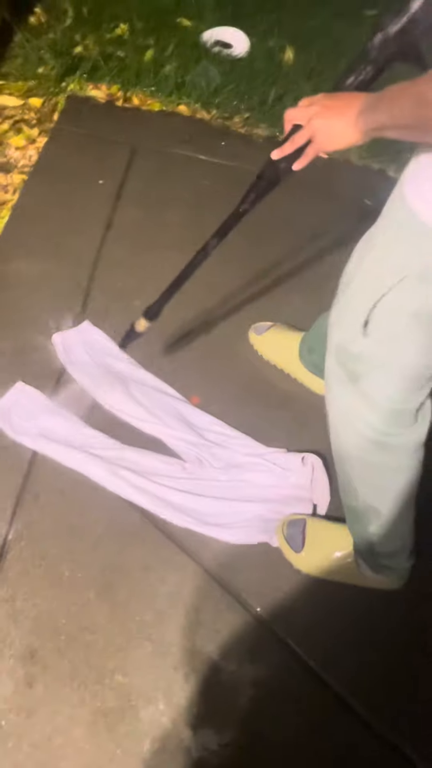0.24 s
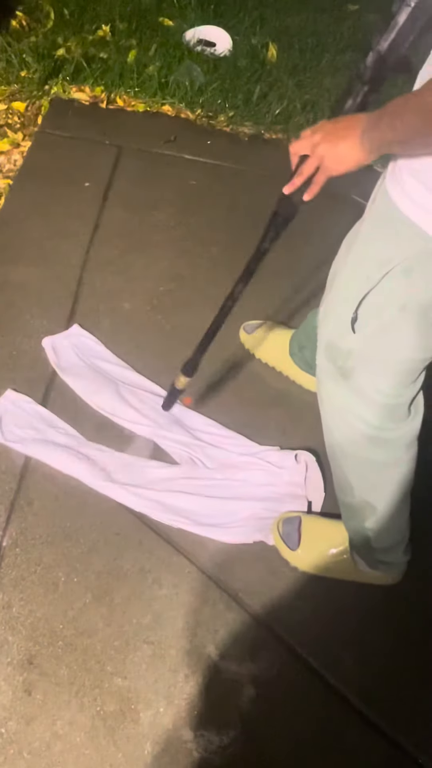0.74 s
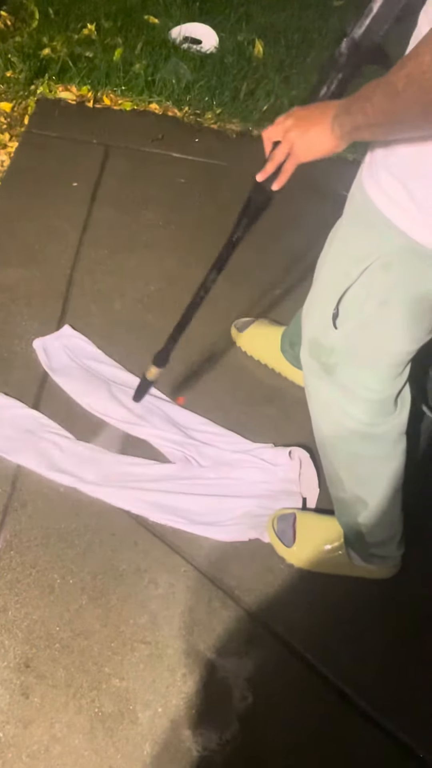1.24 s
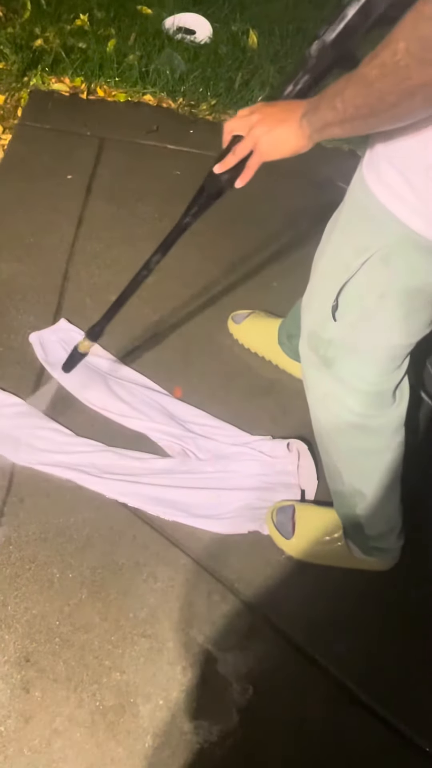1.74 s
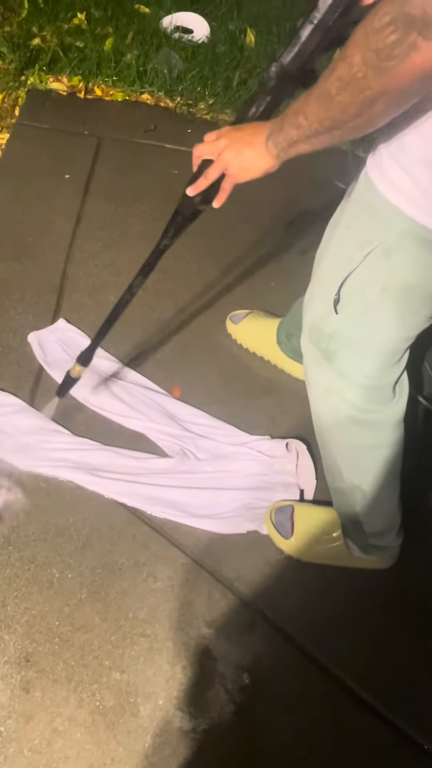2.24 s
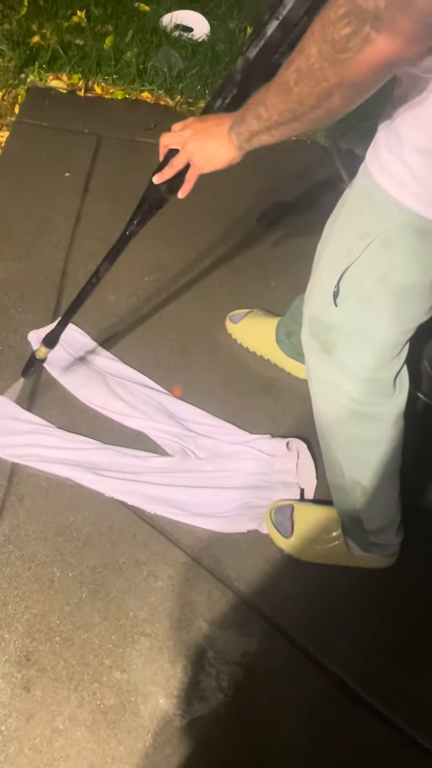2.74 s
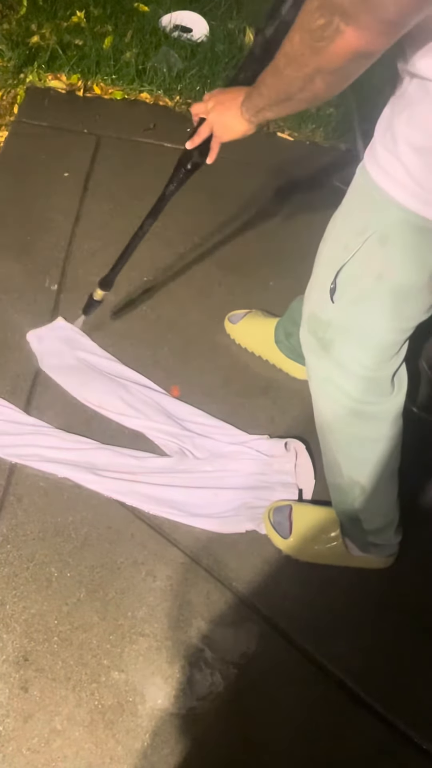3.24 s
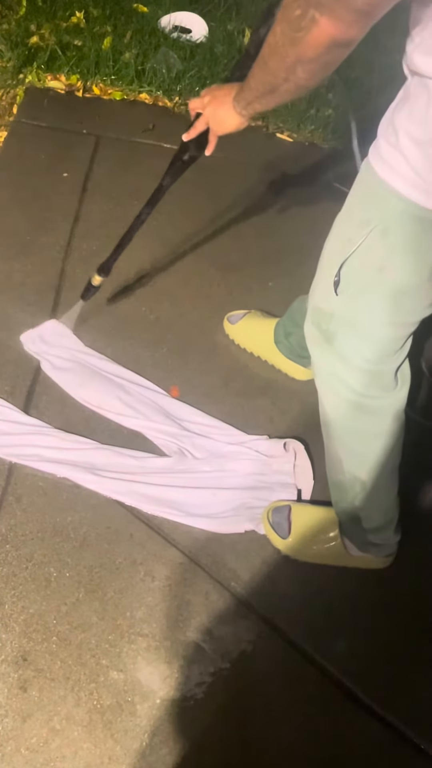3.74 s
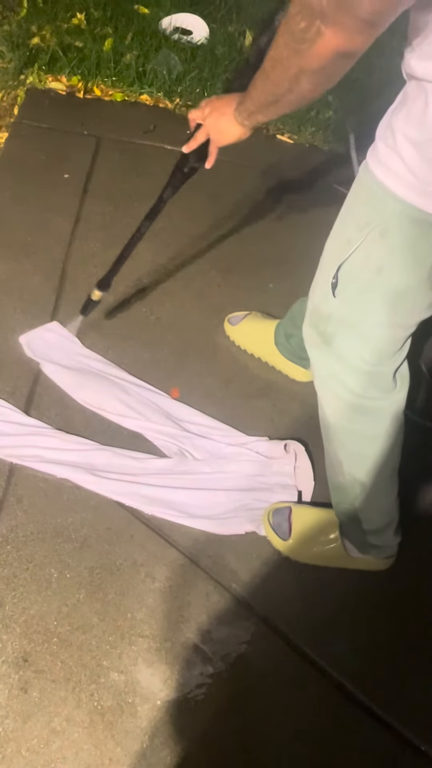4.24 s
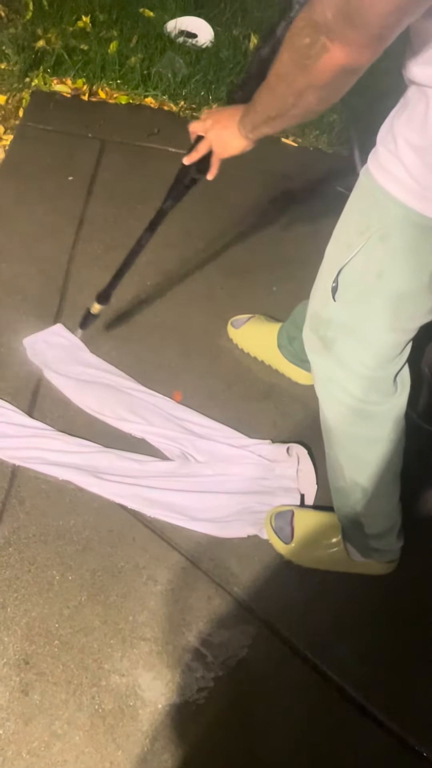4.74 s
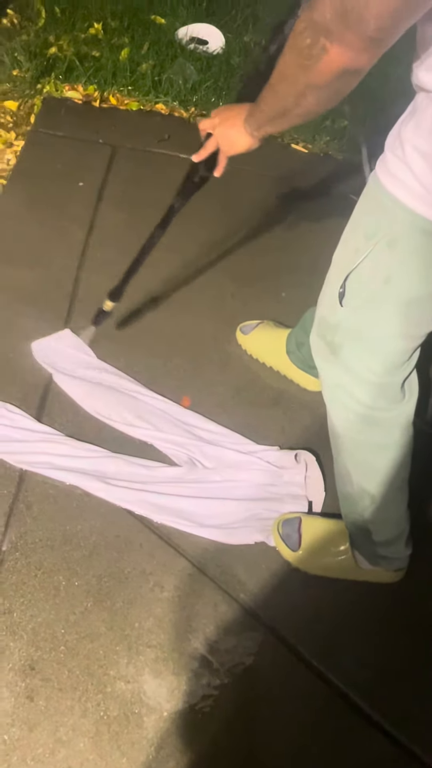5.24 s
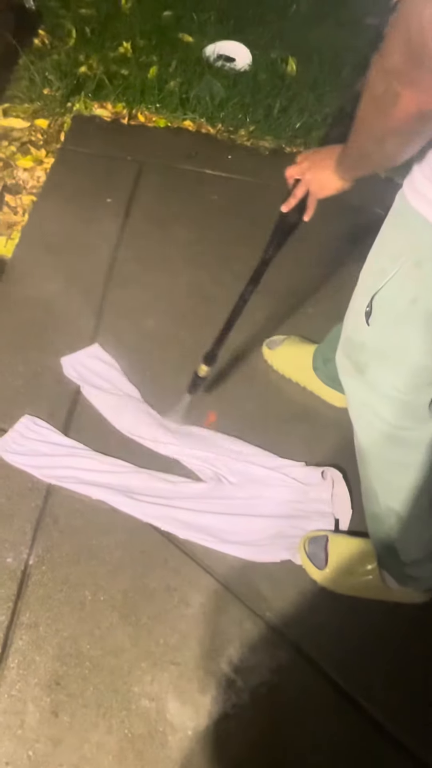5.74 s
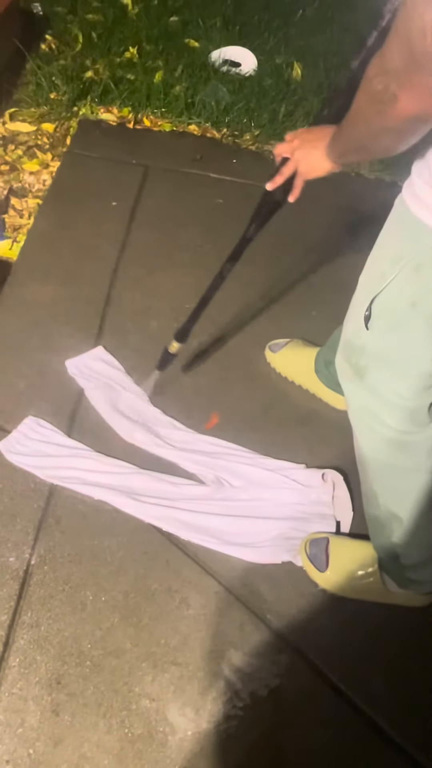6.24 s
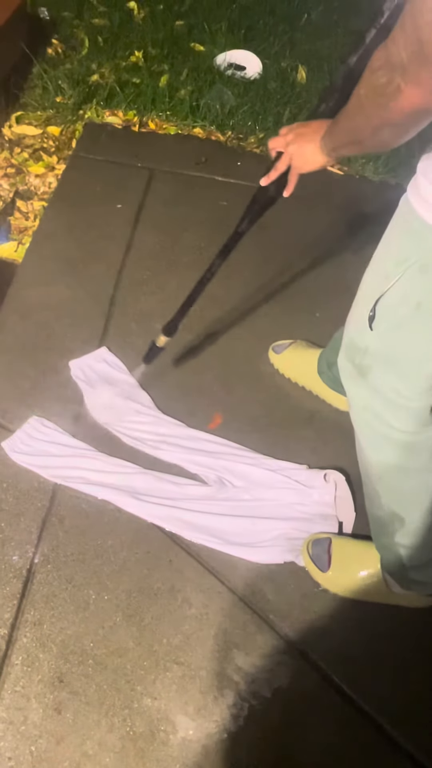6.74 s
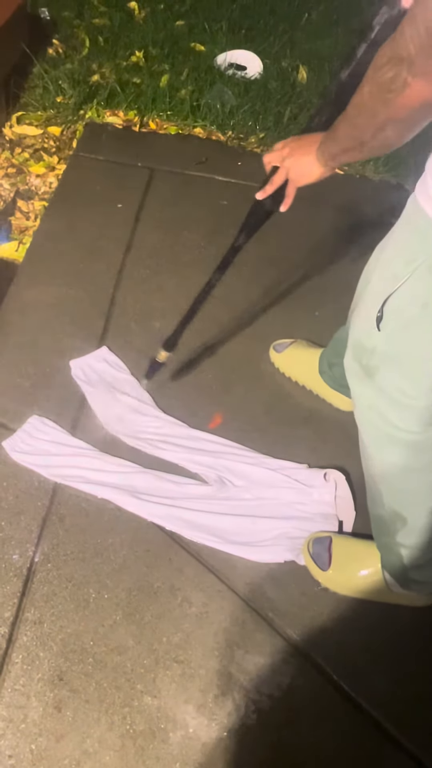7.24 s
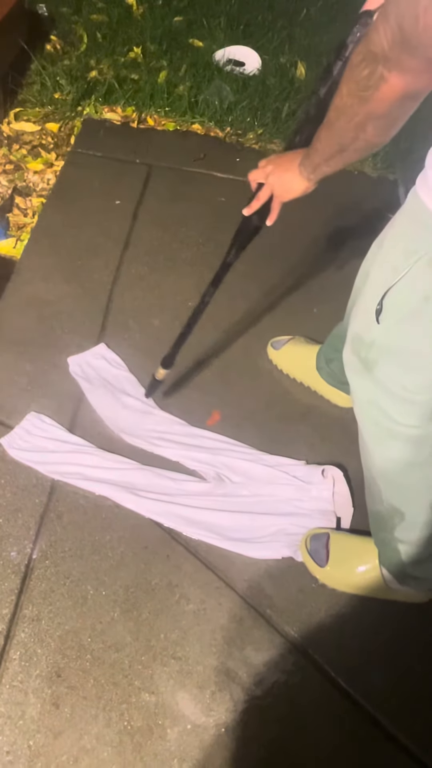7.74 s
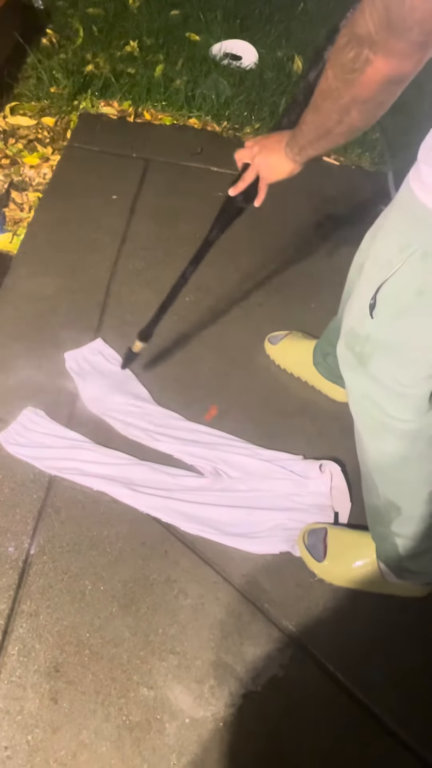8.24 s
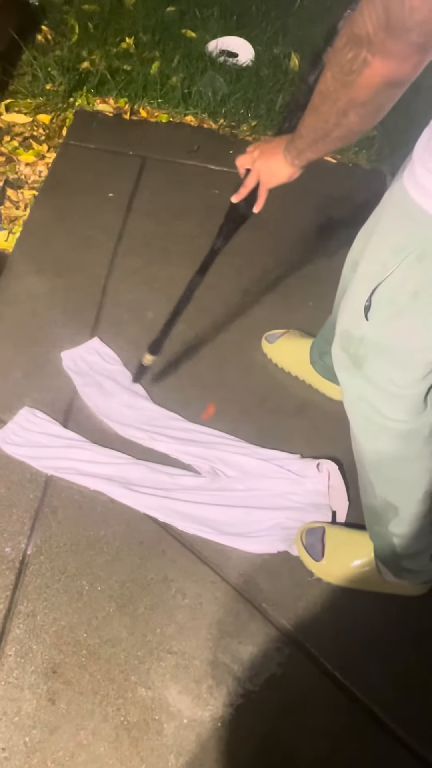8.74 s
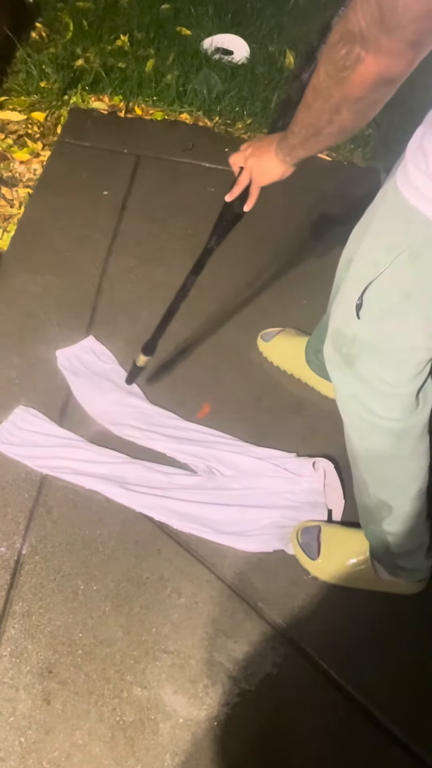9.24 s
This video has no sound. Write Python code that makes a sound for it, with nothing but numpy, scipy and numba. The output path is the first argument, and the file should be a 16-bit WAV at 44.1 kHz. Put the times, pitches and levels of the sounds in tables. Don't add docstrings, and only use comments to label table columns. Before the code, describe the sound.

Outdoors on a paved yard, an electric pressure washer runs continuously, its fast pump knock and motor hum forming a steady buzzing drone with rushing cooling air. Close in front, a dense, bright spray hisses and splashes over soaked trousers, surging with each wand stroke, drumming hollowly on wet fabric and thudding softly on the slab. The spray is strongest early and thinner later, while a faint gear whine comes and goes. Close phone stereo.

```python
import sys
import numpy as np
from scipy import signal
from scipy.fft import rfft, irfft, next_fast_len
from scipy.io import wavfile
from scipy.ndimage import uniform_filter1d
from numba import njit

SR = 44100
rng = np.random.default_rng(int(sys.argv[2]) if len(sys.argv) > 2 else 0)


def magnitude_from_level(level_db):
    exponent = np.asarray(level_db, float) / 20
    return 10 ** exponent


def store_wav(level_fs):
    pcm = np.round(np.clip(np.atleast_2d(level_fs), -1, 1) * 32767)
    wavfile.write(sys.argv[1], SR, pcm.T.astype(np.int16))


N = 418950

PUMP_HZ, SWIRL_HZ = 71.98, 98.9
SPLASH_REF_DB = -30.5
# start_s, splash_db, swirl_depth (0-1)
AIM = [(0, -26.5, 0), (.2, -31, 0.2), (.8, -29.5, .15), (1.15, -31.5, 0.1), (1.5, -28, 0.2),
       (1.8, -28.5, .6), (2.23, -30.5, 0.2), (2.8, -29, .5), (3.02, -34.5, 0), (3.5, -33.5, .2),
       (4.1, -32, .15), (4.48, -37.5, 0.5), (4.9, -33, .2), (5.65, -38, .08), (6.0, -32.5, 0),
       (7.0, -31.5, 0.3), (7.62, -36.5, .15), (9.5, -34.5, .12)]


def set_rms(x, db):
    return x * magnitude_from_level(db) / np.sqrt(np.mean(x ** 2))


def read_curve(table, hz):
    row_hz, value = np.transpose(table)
    return np.interp(np.log(hz + 1), np.log(row_hz + 1), value)


def automate(table):
    at_s, *values = np.transpose(table)
    return [np.interp(np.arange(N) / SR, at_s, value) for value in values]


def swells(at_s, size, width_s):
    coarse_s = np.arange(0, N / SR + .01, .005)
    bells = np.exp(-((coarse_s[:, None] - at_s) / width_s) ** 2 / 2) @ size
    return np.interp(np.arange(N) / SR, coarse_s, bells)


def equalise(x, gain):
    size = next_fast_len(N)
    hz = np.arange(size // 2 + 1) * SR / size
    return irfft(rfft(x, size) * gain(hz), size)[..., :N]


def tinted(x, table):
    return set_rms(equalise(x, lambda hz: magnitude_from_level(read_curve(table, hz))), 0)


def walk(rate):
    hold = int(SR / rate)
    held = np.repeat(rng.standard_normal(N // hold + 1), hold)
    return 1.3 * uniform_filter1d(uniform_filter1d(held, hold), hold)[:N]


def turns(hz, drift):
    return 2 * np.pi * np.cumsum(hz * (1 + drift * walk(3))) / SR


def noise():
    return rng.standard_normal((3, N))


@njit
def band(x, hz, damp):
    y = np.empty_like(x)
    for c in range(x.shape[0]):
        b, l = 0., 0.
        for i in range(x.shape[1]):
            g = np.tan(np.pi * hz[i] / SR)
            v = (b + g * (x[c, i] - l)) / (1 + g * (g + damp))
            b, l, y[c, i] = 2 * v - b, l + 2 * g * v, damp * v
    return y


def tone(angle, mid_db, side_db, scatter=1):
    angle = angle + 2 * np.pi * scatter * rng.random()
    side = magnitude_from_level(side_db) * np.sin(angle - 1.18)
    waver = magnitude_from_level(1.5 * walk(6))
    return np.sqrt(2) * waver * (magnitude_from_level(mid_db) * np.sin(angle) + np.array([side, -side]))


def fan(pump):
    # pitch_hz, level_db
    rush = [(30, -45.5), (60, -15), (130, -14.5), (250, -8), (330, 1.5), (520, 1.5), (720, -3.5),
            (900, 3.5), (1250, -2), (1700, -2), (2400, -4.5), (3300, -8.5), (4300, -5), (5500, -16.5)]
    air = tinted(noise() * (1 + .25 * np.cos(pump)), rush)
    return set_rms(air * magnitude_from_level(0.41 * walk(7.1)), -36.5)


def washer(pump):
    # mid_db, side_db
    knock = [(-57, -95), (-61, -86), (-47.5, -83.5), (-49, -68.5), (-36.5, -51), (-68, -66), (-36.5, -44),
             (-63.5, -55.5), (-48, -51.5), (-73.5, -49), (-42.5, -75.5), (-44.5, -67), (-59, -57.5),
             (-39, -46), (-49, -76), (-48, -53), (-48.5, -59), (-82, -49), (-55.5, -65), (-57, -66),
             (-54.5, -57.5), (-55, -61), (-46, -50.5), (-48.5, -54), (-74.5, -63), (-66, -61), (-73, -70),
             (-63.5, -59.5), (-53, -53), (-60, -60.5)]
    # multiple of shaft rate, mid_db, side_db
    shaft = [(1, -43.5, -54.5), (2, -53, -58), (3, -58.5, -60), (13, -64, -64.5), (15, -46.5, -59)]
    # pitch_hz, level_db
    beats = [(180, -57), (250, -60.5), (400, -55), (470, -47), (550, -58), (700, -54.5), (800, -56.5),
             (1000, -52), (1200, -58), (1600, -77.5)]
    # start_s, mid_db
    whine = [
        (0, -58.5),
        (5.8, -57),
        (6.3, -47.5),
        (6.8, -54),
        (7.3, -49),
        (7.94, -41),
        (8.44, -52),
        (8.8, -45.5),
        (9.5, -53.5),
    ]
    gear = 50 / 11
    out = 0
    for k, (mid_db, side_db) in enumerate(knock):
        out = out + tone((k + 1) * pump, mid_db, side_db, scatter=1 if k < 9 else .45)
    for k, mid_db, side_db in shaft:
        out = out + tone(int(k) * gear * pump, mid_db, side_db)
    out = out + tone(50 * pump, automate(whine)[0] - 4, -48)
    out = out + tone(49 * pump, -60.5, -53)
    sums = [(k + gear, 0) for k in range(-2, 18) if k]
    differences = [(k - gear, -2) for k in range(12, 29)]
    for k, trim_db in sums + differences:
        mid_db = trim_db + read_curve(beats, k * PUMP_HZ)
        side_db = mid_db - 8 - 18 * (k < 4)
        out = out + tone(k * pump, mid_db, side_db)
    return out


def cloth(swirl):
    # start_s, pitch_hz, drum_db
    pockets = [(0.0, 432, -47), (.27, 810, -33), (.58, 780, -32.5), (.88, 566, -37), (1.0, 1000, -38),
               (1.152, 677, -38), (1.36, 600, -31.5), (1.53, 976, -33), (1.75, 995, -30.5),
               (2.0, 965, -30.5), (2.14, 590, -35), (2.27, 852, -38), (2.65, 1004, -31.5),
               (2.87, 438, -42.5), (3.15, 600, -43), (3.5, 880, -36.5), (3.75, 1113, -35),
               (4.118, 680, -35), (4.52, 557, -37), (4.87, 1087, -35.5), (5.152, 710, -37),
               (5.93, 400, -31.5), (6.15, 480, -39), (6.37, 660, -33), (6.75, 760, -38), (7.0, 756, -41.5),
               (7.4, 690, -38), (7.87, 724, -35), (8.55, 597, -43), (9.37, 904, -37.5)]
    # start_s, thud_db
    thuds = [(.12, -44), (.45, -40), (.85, -48.5), (1.02, -40), (1.369, -43), (1.52, -57), (2.52, -46.5),
             (2.95, -53), (3.15, -56), (3.45, -49.5), (5.1, -53.5), (6.24, -45.5), (6.68, -49),
             (8.48, -52.5)]
    handover_s, pocket_s, thud_s, damp = .05, .065, .07, .46
    force_db = automate(AIM)[0] - SPLASH_REF_DB

    at_s, pocket_hz, peak_db = np.transpose(pockets)
    weighted = swells(at_s, magnitude_from_level(peak_db) * np.log(pocket_hz), handover_s)
    hz = np.exp(weighted / swells(at_s, magnitude_from_level(peak_db), handover_s))
    drum_gain = magnitude_from_level(-45 + 1.3 * force_db) + swells(at_s, magnitude_from_level(peak_db), pocket_s)
    at_s, peak_db = np.transpose(thuds)
    thud_gain = magnitude_from_level(-53 + .4 * force_db + 2.7 * walk(7)) + swells(at_s, magnitude_from_level(peak_db), thud_s)

    passes = np.diff(np.floor(swirl / (2 * np.pi)), prepend=0)
    uneven = walk(60)
    blows = passes * magnitude_from_level(3.0 * uneven)
    blows = set_rms(blows - blows.mean(), 0)
    steady = passes * magnitude_from_level(1.3 * uneven)
    steady = set_rms(steady - steady.mean(), 0)

    gurgle = noise() * magnitude_from_level(2.5 * walk(200))
    drive = blows * np.array([[1], [0], [0]]) + gurgle
    drum = band(band(drive, hz, damp), hz, 1.8 * damp)
    drum = drum / np.sqrt(uniform_filter1d(drum[0] ** 2, SR // 6))
    low_hz = np.full(N, 135.)
    thud = band(band(steady + 0.22 * noise()[:1], low_hz, 2.0), low_hz, 2.0)
    return drum * drum_gain + set_rms(thud, 0) * thud_gain


def jet(swirl):
    # pitch_hz, level_db
    splash = [(700, -19), (1200, -2), (1700, 0), (2200, -1), (2800, 2.5), (3400, -3), (4300, -3),
              (4800, -18), (6500, -13.5)]
    hiss = [(3500, -22), (4300, -7.5), (4750, -6.5), (4900, 0), (5700, -1.5), (7500, -3), (8800, -6),
            (10500, -15)]
    mist = [(7500, -17), (9000, -2.5), (10500, .5), (12000, -2), (13300, -3.5), (14500, -1.5), (15600, 1)]
    bright_band = [(2300, -22), (2900, -3), (3250, 0.5), (3700, -4), (4200, -21.5)]
    # start_s, level_db
    mist_rise = [
        (0, -30),
        (.55, -37),
        (.75, -34),
        (1.4, -36),
        (3.1, -31),
        (4.5, -32.5),
        (6.4, -33.5),
        (9.5, -29),
    ]
    # start_s, lift_db
    strokes = [(0.0, 1), (0.469, 1.5), (.85, 1.5), (1.02, 2), (1.361, 2.5), (1.66, 1), (2.001, 2),
               (2.409, 4), (2.73, 1), (3.17, 3.5), (3.399, 3), (3.65, 2), (4.099, 2.5), (4.4, 1), (4.8, 2),
               (5.15, 3.5), (6.1, 1.5), (6.35, 2.5), (6.6, 1.5), (6.92, 1.5), (7.3, 2), (7.82, 2),
               (8.18, 2), (8.502, 1.5), (8.8, 2), (9.2, 0), (9.5, 1.5)]
    aim_db, depth = automate(AIM)
    lift_db = swells(*np.transpose(strokes), .064)
    splash_db = aim_db + lift_db
    hiss_db = -27 + .44 * (aim_db - SPLASH_REF_DB) + .7 * lift_db
    bright_db = -41.5 + 2.5 * (splash_db - SPLASH_REF_DB)
    mist_db = automate(mist_rise)[0] + 2.5 + .48 * lift_db
    flare = set_rms(np.exp(1.2 * np.cos(swirl)), 0) * magnitude_from_level(1.74 * walk(SWIRL_HZ))
    layers = ((splash, splash_db, 1.2), (hiss, hiss_db, .3), (mist, mist_db, .25), (bright_band, bright_db, 1.2))
    out = 0
    for table, layer_db, share in layers:
        beat = np.clip(share * depth, 0, .9)
        drops = magnitude_from_level(1.5 * walk(700))
        spray = noise() * drops * (np.sqrt(1 - beat) + np.sqrt(beat) * flare)
        spray = spray / np.sqrt(uniform_filter1d((spray ** 2).mean(axis=0), SR // 8))
        patchy_db = .99 * walk(14)
        out = out + tinted(spray, table) * magnitude_from_level(layer_db + patchy_db)
    return out


def ports(rows, spread):
    # pitch_hz, shared power (0-1)
    likeness = [(220, 1), (350, .93), (750, .5), (1300, .72), (1800, .75), (2400, .55), (3500, .3),
                (4400, .33), (5500, .62), (7000, .72), (8500, .8), (9700, .97), (13100, .97), (15400, .6)]
    # pitch_hz, lead_rad
    lead = [(250, 0), (730, -1), (1250, -1.3), (1770, -.45), (2280, .2), (2800, -.7), (3550, -3.1),
            (4400, -4.2), (4900, -6.9), (5900, -5.1), (8000, -3.7), (11000, -3.14), (14000, -3),
            (15600, -1.8)]
    # pitch_hz, level_db
    balance = [(250, 0), (380, 2), (700, 1), (1290, 2.5), (2380, 2), (3800, -3), (5500, 0)]
    out = []
    for sign, own in ((0.88, rows[1]), (-1.047, rows[2])):
        tilt = lambda hz: magnitude_from_level(sign * read_curve(balance, hz) / 2)
        alike = lambda hz: np.clip(read_curve(likeness, hz), 0, 1) ** spread
        shift = lambda hz: np.exp(.5j * sign * read_curve(lead, hz))
        shared = equalise(rows[0], lambda hz: tilt(hz) * np.sqrt(alike(hz)) * shift(hz))
        private = equalise(own, lambda hz: tilt(hz) * np.sqrt(1 - alike(hz)))
        out.append(shared + private)
    return np.array(out)


def scene():
    pump = turns(PUMP_HZ, 0.000614)
    swirl = turns(SWIRL_HZ, .004)
    air = ports(fan(pump), spread=.15)
    machine = washer(pump)
    water = ports(cloth(swirl) + jet(swirl), spread=0.98)
    return air + machine + water


def roll_off(x):
    return signal.sosfilt(signal.butter(12, 17500, fs=SR, output="sos"), x)


def record(dry):
    heard = signal.sosfilt(signal.butter(2, 58, "high", fs=SR, output="sos"), dry)
    return roll_off(heard)


dry = scene()
out = record(dry)
store_wav(out)
```